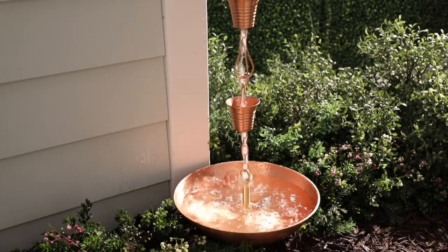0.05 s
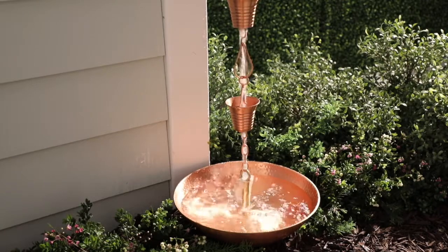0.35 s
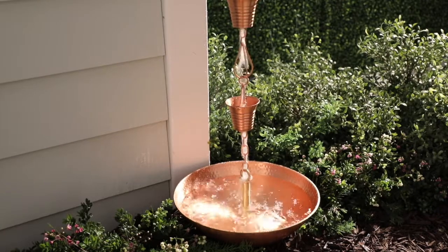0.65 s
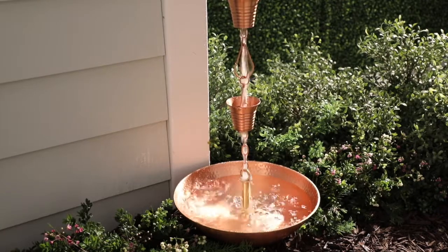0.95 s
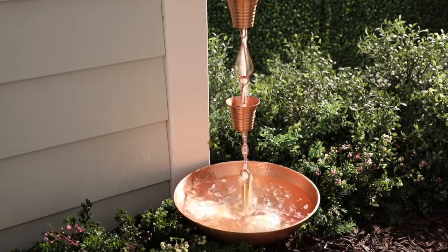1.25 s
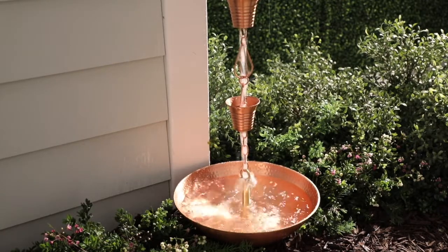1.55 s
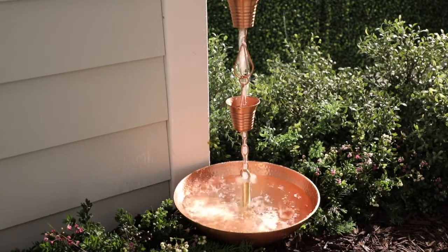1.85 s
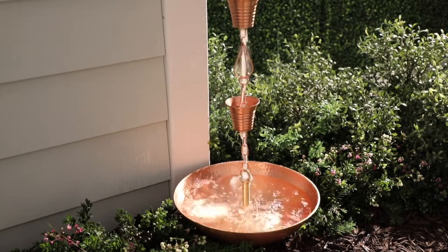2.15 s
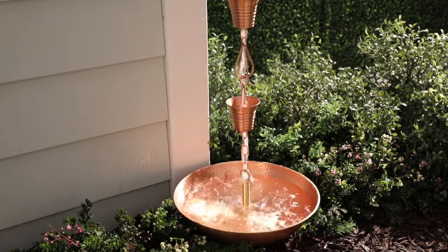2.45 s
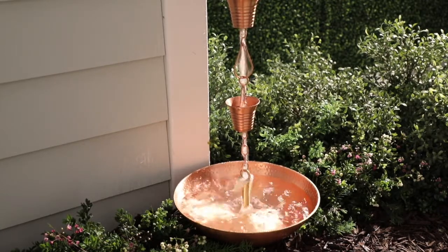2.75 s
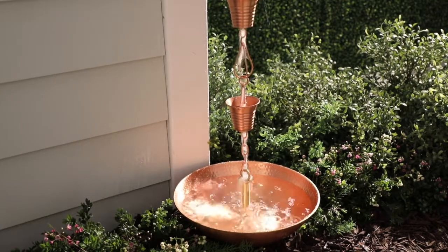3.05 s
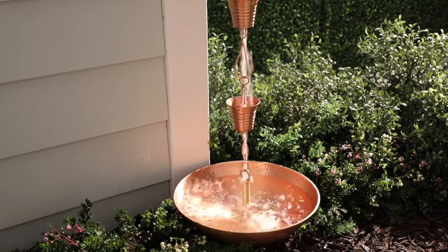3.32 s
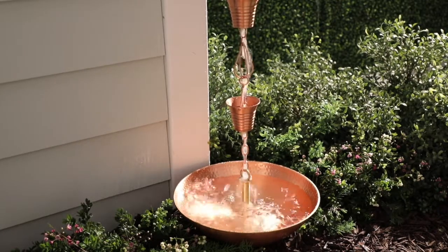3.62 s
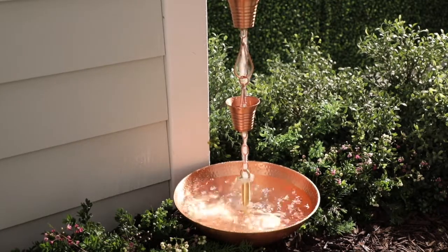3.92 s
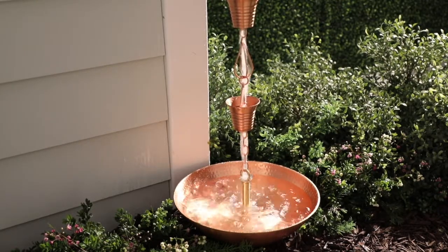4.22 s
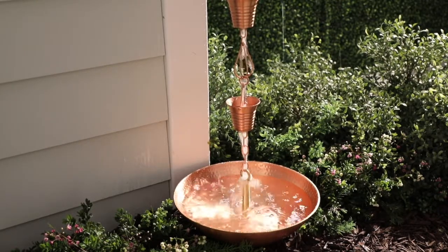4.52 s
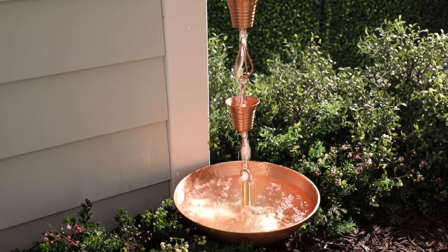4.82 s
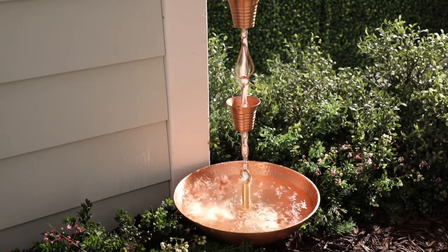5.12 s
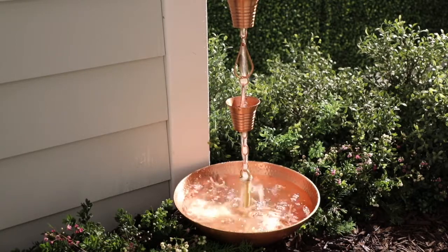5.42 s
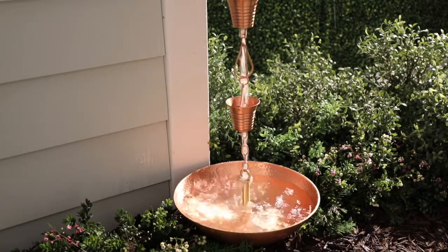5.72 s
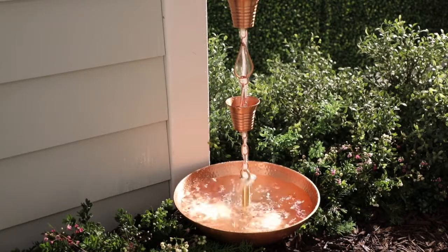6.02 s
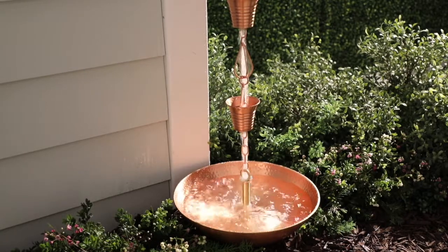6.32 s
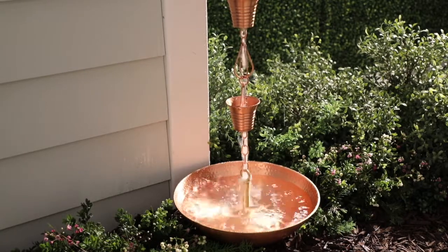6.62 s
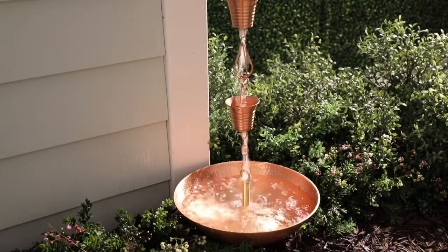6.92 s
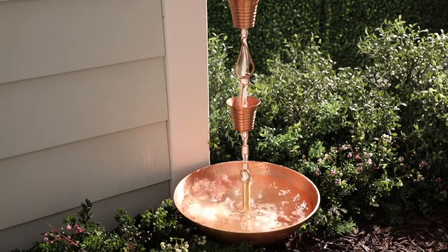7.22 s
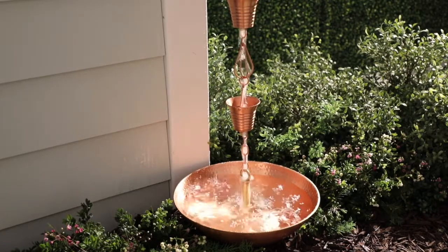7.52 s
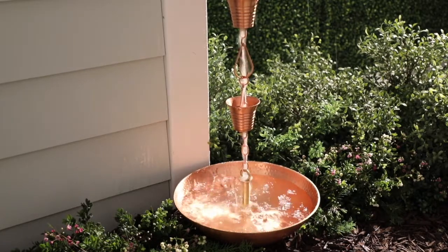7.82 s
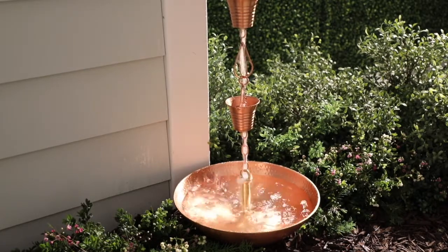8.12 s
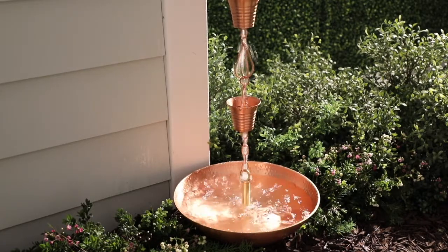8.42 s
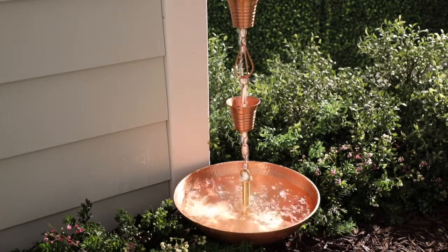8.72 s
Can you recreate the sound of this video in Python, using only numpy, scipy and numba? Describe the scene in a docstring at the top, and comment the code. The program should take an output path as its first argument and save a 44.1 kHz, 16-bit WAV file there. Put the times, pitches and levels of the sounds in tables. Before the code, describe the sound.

Water runs down a copper rain chain and splashes steadily into a shallow, filled metal basin beside a house. The bright, fizzy patter is dotted with sharp drips, plinks and small splats, and slowly grows a little duller. Midway a soft hollow gurgle sinks in pitch; later a cup on the chain rings thinly. A faint low outdoor rumble lies underneath, all in mono with very short echoes.

```python
"""Beside a house wall, water runs down a copper rain chain into a shallow, filled metal basin.
Thousands of tiny ringing bubbles and droplet ticks make a patter that slowly gets duller. Hard drops
stand out, lumps in the stream land as splats, and one hollow gurgle sinks in pitch. Later a cup on the
chain starts to sing thinly. Large bubbles churn faintly over a low outdoor rumble, and the wall and
basin add short echoes. The sound is mono."""
import sys
import numpy as np
from scipy import signal
from scipy.fft import rfft, irfft
from scipy.io import wavfile
from numba import njit

SR = 44100
rng = np.random.default_rng(int(sys.argv[2]) if len(sys.argv) > 2 else 0)


def int16_out(signal):
    """Quantize to a 16-bit WAV file."""
    q = np.round(np.clip(np.atleast_2d(signal).T, -1, 1) * 32767)
    wavfile.write(sys.argv[1], SR, q.astype(np.int16))


N = 386316
TIME = np.arange(N) / SR
FREQS = np.maximum(np.fft.rfftfreq(2 * N, 1 / SR), 1)
TOP_HZ = 13930  # upper edge of the sound

# how strongly the stream flows (t/s, relative level/dB)
STREAM_FLOW = [(0.01, -30.5), (0.33, -30), (1.12, -30.5), (1.93, -30), (3.77, -31), (4.33, -30),
               (4.64, -31), (4.88, -29.5), (5.12, -31.5), (5.37, -29), (5.68, -30.5), (5.98, -31.5),
               (6.17, -30.5), (7.04, -30.5), (7.42, -31.5), (7.56, -30.5), (7.7, -31), (8.48, -31.5),
               (8.76, -30.5)]
# tone of the splashing, from low to high (f/Hz, relative level/dB)
SPLASH_TONE = [(150, -39.5), (300, -30), (500, -16.5), (800, -13.5), (1400, -7.5), (1750, -5), (2250, 1),
               (4000, 1.1), (6500, -0.5), (9000, 0), (9700, -2), (10900, -2.5), (12400, -11),
               (13900, -13.5)]
# pitches at which the basin and cups ring (f/Hz, width/Hz, boost/dB)
BASIN_RINGS = [(1195, 340, 5.5), (2440, 150, 1.5), (5320, 480, 1.5), (8550, 290, 1)]
# hard drops: few cycles make a tick, many a plink (t/s, peak level/dB, f/Hz, length/cycles)
HARD_DROPS = [(0.0721, -17, 7000, 20), (0.383, -21, 7970, 23), (0.4020, -21, 7020, 30),
              (0.858, -18, 9880, 30), (0.8586, -32, 1400, 13), (0.9407, -18, 7600, 16),
              (0.9743, -24, 3350, 32), (1.0255, -43, 770, 21), (1.0385, -41, 775, 14),
              (1.3020, -25, 4730, 45), (1.361, -21, 8570, 30), (1.6477, -22, 7700, 26),
              (1.9156, -21, 8600, 22), (1.961, -24, 7560, 45), (1.9980, -24, 2950, 30),
              (2.0165, -24, 4750, 36), (2.306, -20.5, 5870, 30), (3.2552, -22, 8800, 48),
              (3.2779, -23, 7900, 28), (3.5414, -24, 8000, 28), (2.5265, -29, 1870, 17),
              (2.5283, -18, 7600, 20), (3.203, -30.5, 1560, 18), (3.4055, -21, 5190, 18),
              (3.5244, -22.5, 2120, 27), (3.6354, -21, 9300, 24), (3.7221, -18, 9700, 28),
              (4.1194, -18, 5250, 18), (4.146, -41, 760, 12), (4.1911, -21, 3980, 22),
              (4.2788, -20, 7760, 22), (4.4297, -33, 1736, 18), (4.432, -33, 1350, 23),
              (4.8550, -24, 4200, 28), (4.9427, -13, 7000, 16), (5.3247, -24, 6100, 30),
              (5.3454, -13, 8300, 11), (5.4681, -26, 9000, 54), (5.501, -28, 2020, 21),
              (5.555, -29, 1890, 15), (5.670, -24, 3050, 30), (5.6836, -16, 8000, 17),
              (5.682, -28, 2400, 28), (5.7349, -19, 9700, 42), (5.9720, -24, 8060, 20),
              (6.234, -33, 1380, 16), (6.332, -23, 5370, 30), (6.6232, -23, 8850, 36),
              (6.9058, -22, 10300, 32), (6.9415, -30, 1380, 15), (6.960, -36, 1460, 13),
              (6.9920, -19, 6750, 20), (7.0023, -35, 1140, 36), (7.502, -36, 1540, 26),
              (7.5351, -40, 1140, 21), (7.5632, -24, 2280, 21), (7.6651, -26, 5310, 26),
              (7.723, -21, 4800, 20), (8.0742, -23, 7170, 36), (8.217, -21, 7220, 28),
              (8.5953, -21, 7380, 22), (8.6380, -19, 7550, 22)]
# lumps of water landing, and two narrow swells of the cup's note near 1160 and 1210 Hz (t/s, relative level/dB,
# middle f/Hz, spread/octaves, length/s)
SPLASH_BURSTS = [(0.46, -30, 4260, 0.65, 0.023), (0.965, -34, 3300, 0.18, 0.012),
                 (0.966, -32, 7500, 0.31, 0.017), (1.285, -46, 1600, 0.16, 0.036),
                 (1.92, -54, 670, 0.071, 0.067), (1.994, -40, 3120, 0.19, .012),
                 (2.52, -31, 7100, 0.58, 0.015), (2.593, -45.5, 1610, 0.25, 0.062),
                 (3.01, -54, 636, 0.048, 0.037), (3.243, -37, 8660, 0.15, 0.036),
                 (4.912, -33, 6900, 0.53, 0.019), (4.909, -43, 1600, 0.33, 0.026),
                 (5.035, -30.5, 5050, 0.72, 0.026), (5.584, -31, 6500, 0.45, 0.0096),
                 (5.667, -36, 2900, 0.27, 0.021), (5.668, -33, 7200, 0.38, 0.02),
                 (6.169, -48, 905, 0.26, 0.093), (6.507, -30.5, 5000, 0.78, 0.021),
                 (6.936, -47, 1720, 0.31, 0.041), (6.986, -32, 3080, 0.47, 0.022),
                 (6.993, -35, 7440, 0.3, 0.017), (6.995, -35, 5100, 0.2, 0.015),
                 (6.999, -48, 1160, 0.04, 0.065), (7.52, -46, 1210, 0.055, 0.031),
                 (7.544, -43, 2255, 0.15, .03)]
# the sinking gurgle (t/s, f/Hz, typical bubble level/dB)
GURGLE_PATH = [(4.28, 1030, -56), (4.43, 950, -49), (4.55, 870, -46), (4.72, 825, -55), (4.92, 780, -59)]
# how loudly the cup sings (t/s, typical level/dB)
CUP_LEVEL = [(0.0, -76), (6.2, -67), (6.8, -60.5), (8.76, -62.5)]
# large bubbles churning in the basin (t/s, peak level/dB of a bubble at the highest pitch)
BURBLE_LEVEL = [(0.0, -58), (0.42, -84), (0.55, -59.5), (1.35, -61.5), (2.7, -59.5), (3.7, -57), (4.9, -55),
                (5.2, -65), (6.2, -57), (7.1, -59), (8.76, -57)]
# tone of still outdoor air (f/Hz, relative level/dB)
AIR_TONE = [(15, 12.5), (30, -14), (43, 1.5), (56, -10), (85, -11.5), (125, -7.5), (170, -5.5), (250, -33),
            (500, -16), (2000, -59)]
# how the low rumble swells and fades (t/s, relative level/dB)
AIR_SWELL = [(0.35, -2), (0.5, -1), (0.72, -3), (0.9, -1), (1.7, -5), (1.92, 3), (2.25, -5), (2.45, -1),
             (2.8, -1), (3.3, -7), (3.85, -2), (4.65, -4), (4.85, 2), (5.18, -3), (5.35, 3), (5.95, -5),
             (6.2, -4), (7.05, -0.5), (7.5, -4), (8.2, -2)]


def stream():
    """The stream hits the basin: thick fizz, sharp ticks, round plinks and long pings."""
    surge = np.clip(wander(count=520), -2, 1.2)  # water leaves the chain in uneven lumps
    fizz = patter(surge, count=120000, cycles=10.5, scatter_db=5, cap_db=3,
                  rise=0.06, onset=0.053, surge_db=1.12)
    ticks = patter(surge, count=17000, cycles=3.2, scatter_db=3, cap_db=7.5,
                   rise=0.074, onset=0.072, surge_db=1.2)
    plinks = patter(surge, count=8000, cycles=30.5, scatter_db=3, cap_db=9.5,
                    rise=0.14, onset=0.078, surge_db=1.4)
    pings = patter(surge, count=3000, cycles=200, scatter_db=2, cap_db=9.5,
                   rise=0.058, onset=0.042, surge_db=0.5, low_hz=1308.7)
    water = level(fizz, -4) + level(ticks, -10) + level(plinks, -10.5) + level(pings, -12)
    basin_db = sum(db / (1 + (2 * (FREQS - hz) / width) ** 2) for hz, width, db in BASIN_RINGS)
    return level(colour(water, spectrum(SPLASH_TONE) + basin_db), -32.5)


def patter(surge, count, cycles, scatter_db, cap_db, rise, onset, surge_db, low_hz=170):
    """A cloud of bubbles of all sizes, each as strong as the stream is when it forms."""
    darken_db_per_octave_s, pivot_hz = 0.1253, 4500
    when, pitch, sign = rng.random((count, 3)).T
    ring, force = rng.standard_normal(count), rng.exponential(size=count)
    start = when * N / SR
    hz = (np.sqrt(low_hz) + pitch * (np.sqrt(TOP_HZ) - np.sqrt(low_hz))) ** 2
    ring_cycles = cycles * np.exp(0.41 * ring)
    flow_db = read(STREAM_FLOW, start)[0]
    # over time, bubbles below the pivot pitch get louder and the fine spray above it gets softer
    darken_db = darken_db_per_octave_s * np.log2(pivot_hz / hz) * (start - TIME.mean())
    db = flow_db - flow_db.mean() + darken_db + surge_db * np.interp(start, TIME, surge)
    db += np.minimum(scatter_db * force, cap_db)  # some bubbles are louder, up to a limit
    balance = hz ** (3 / 4) / np.sqrt(ring_cycles)  # spreads the power evenly from low to high
    return bubbles(start, hz, ring_cycles, np.sign(sign - 0.5) * balance * undb(db), rise, onset)


@njit
def bubbles(start, hz, cycles, strength, rise, onset):
    """Each bubble is a tone that swells, then fades while its pitch rises as it nears the surface."""
    # onset is the share of its life spent swelling; rise=0.1 lifts the pitch by a tenth
    out = np.zeros(N)
    decay = 5.76  # a fade of 50 dB over the bubble's life
    ratio = 1 / (decay * onset)  # fade time over swell time
    peak = ratio / (1 + ratio) ** (1 + 1 / ratio)
    for k in range(len(start)):
        first, life = int(start[k] * SR), int(cycles[k] * SR / hz[k]) + 2
        turn = 2 * np.pi * hz[k] / SR
        tone = strength[k] / peak + 0j
        step = np.exp(1j * turn - decay / life)  # moves the tone on by one sample and fades it
        glide = np.exp(1j * turn * rise / life)
        muted, release = 1., np.exp(-1 / (onset * life))
        for i in range(max(first, 0), min(first + life, N)):
            tone *= step
            step *= glide
            muted *= release
            out[i] += tone.imag * (1 - muted)
    return out


def drops():
    """Each hard drop traps one bubble that gives a short chirp."""
    start, db, hz, cycles = np.transpose(HARD_DROPS).copy()
    return bubbles(start, hz, cycles, undb(db), rise=0.094, onset=0.037)


def splats(count=44, cycles=12., scatter_db=1, fade_db=7, gain_db=-2):
    """Each row gives a short, fading burst of bubbles of similar size: a lump of water landing, or a brief
    swell at the cup's pitch."""
    out = np.zeros(N)
    for start, db, middle_hz, spread, length in SPLASH_BURSTS:
        pitch, force = rng.standard_normal((count, 2)).T
        age = (np.arange(count) + rng.random(count)) / count
        hz = np.minimum(middle_hz * 2 ** (spread * np.clip(pitch, -2, 2)), TOP_HZ)
        # small bubbles are brief but carry just as much energy
        strength = np.sqrt(hz) * undb(scatter_db * force - fade_db * age)
        burst = bubbles(start + length * age, hz, np.full(count, cycles), strength, rise=0.14, onset=0.13)
        out += burst * undb(db + gain_db) * np.sqrt(length * SR / np.sum(burst ** 2))
    return out


def hollow(splashing, middle_hz=790, slosh_octaves=0.083):
    """Air rings in the dent where the stream plunges in; its pitch shifts as the water sloshes."""
    hz = middle_hz * 2 ** (slosh_octaves * wander(count=40))
    return resonate(splashing, hz, width_hz=48)


def gurgle(count=80, spread=0.038, cycles=36., jitter_s=0.0042, scatter_db=1.5):
    """The stream drags air under; the bubbles come bigger and bigger, so the pitch sinks."""
    start = np.linspace(GURGLE_PATH[0][0], GURGLE_PATH[-1][0], count)
    start += jitter_s * rng.standard_normal(count)
    middle_hz, db = read(GURGLE_PATH, start)
    pitch, softness = rng.standard_normal((count, 2)).T
    hz = middle_hz * np.exp(spread * pitch)
    strength = undb(db - scatter_db * softness)
    return bubbles(start, hz, np.full(count, cycles), strength, rise=0.027, onset=0.09)


def plops(count=50, cycles=24., middle_hz=1860, spread_octaves=0.54, middle_db=-46, scatter_db=2):
    """Big drops fall beside the stream at random, each trapping one bubble that plops softly."""
    start = rng.random(count) * N / SR
    pitch, force = rng.standard_normal((count, 2)).T
    octaves = spread_octaves * np.clip(pitch, -2, 2)
    db = middle_db + 8 * octaves + scatter_db * force  # smaller bubbles ring louder: 8 dB per octave
    return bubbles(start, middle_hz * 2 ** octaves, np.full(count, cycles), undb(db), rise=0.44, onset=0.08)


def cup(water, hz=1173, slosh_octaves=0.002, waver_db=2.5):
    """The stream shifts onto the wall of a copper cup and keeps a thin, wavering note ringing."""
    ring = resonate(water, hz * 2 ** (slosh_octaves * wander(count=50)), width_hz=16)
    ring = signal.lfilter(*signal.iirpeak(hz, 2, fs=SR), ring)  # trims the splash around the note
    db = read(CUP_LEVEL, TIME)[0] + waver_db * wander(count=60)
    return level(ring, 0) * undb(db)


def burble(count=300, low_hz=105, high_hz=420, cycles=6.):
    """Large bubbles churn faintly and unevenly under the patter; the deeper ones are softer."""
    when, pitch = rng.random((count, 2)).T
    start = (np.arange(count) + when) / count * N / SR
    hz = low_hz + pitch * (high_hz - low_hz)
    strength = undb(read(BURBLE_LEVEL, start)[0]) * (hz / high_hz) ** (2 / 3)
    return bubbles(start, hz, np.full(count, cycles), strength, rise=0.2, onset=0.31)


def add_echoes(water, fade_s=0.067, echo_db=-10):
    """Basin, wall and shrubs scatter the sound of every drop into a short, blurred tail."""
    edges_hz = np.geomspace(400, TOP_HZ, 10)
    keep = np.exp(-2 * np.log(1000) / (fade_s * SR))  # the tail loses 60 dB in fade_s
    tail = 0
    for band in zip(edges_hz, edges_hz[1:]):
        bandpass = signal.butter(2, band, "band", fs=SR, output="sos")
        energy = signal.lfilter([1 - keep], [1, -keep], signal.sosfilt(bandpass, water) ** 2)
        noise = level(signal.sosfilt(bandpass, rng.standard_normal(N)), 0)
        tail += np.sqrt(energy) * noise
    return water + undb(echo_db) * tail


def air():
    """The outdoor air rumbles, faint and low, swelling and fading."""
    rumble = colour(rng.standard_normal(N), spectrum(AIR_TONE))
    return level(rumble * undb(read(AIR_SWELL, TIME)[0]), -66)


def resonate(x, hz, width_hz):
    """Make a sound ring at a moving pitch; a smaller width rings longer."""
    turn = np.exp(2j * np.pi * np.cumsum(hz) / SR)
    keep = np.exp(-np.pi * width_hz / SR)
    return 2 * np.real(turn * signal.lfilter([1 - keep], [1, -keep], x / turn))


def colour(x, db):
    """Shape the tone with a dB curve, so that any ringing comes after each hit, never before."""
    cepstrum = irfft(np.log(undb(db)))
    cepstrum[1:N] *= 2
    cepstrum[N + 1:] = 0
    return irfft(rfft(x, 2 * N) * np.exp(rfft(cepstrum)))[:N]


def spectrum(points):
    """Join (f/Hz, level/dB) points into a curve, giving each octave the same room."""
    hz, db = np.transpose(points)
    return np.interp(np.log(FREQS), np.log(hz), db)


def wander(count):
    """Random values, evenly spaced in time and joined by straight lines."""
    return np.interp(TIME, np.linspace(0, N / SR, count), rng.standard_normal(count))


def read(table, at):
    """Look up a table's values at the given times."""
    times, *columns = np.transpose(table)
    return [np.interp(at, times, column) for column in columns]


def level(x, db):
    """Set the average (rms) level."""
    return x * undb(db) / np.sqrt(np.mean(x ** 2))


def undb(db):
    """Turn decibels into a number to multiply by."""
    return 10 ** (np.asarray(db) / 20)


def scene():
    """All the water and the air around it, the same in both channels."""
    splashing = stream()
    water = splashing + hollow(splashing) + drops() + splats() + gurgle() + plops()
    mono = add_echoes(water) + cup(water) + burble() + air()
    return np.array([mono, mono])


def record(dry):
    """Cut away the very highest treble steeply."""
    return signal.sosfilt(signal.ellip(12, 0.1, 80, TOP_HZ, fs=SR, output="sos"), dry)


dry = scene()
out = record(dry)
int16_out(out)
```